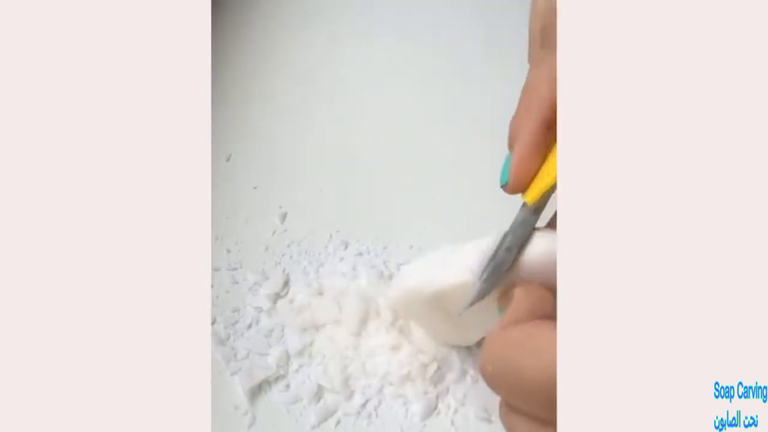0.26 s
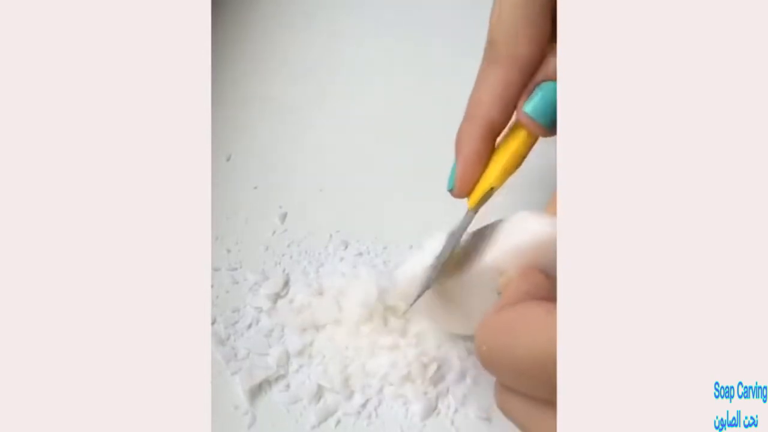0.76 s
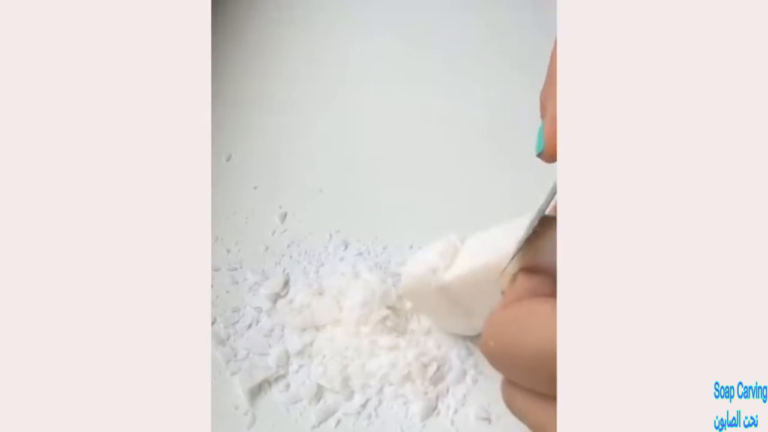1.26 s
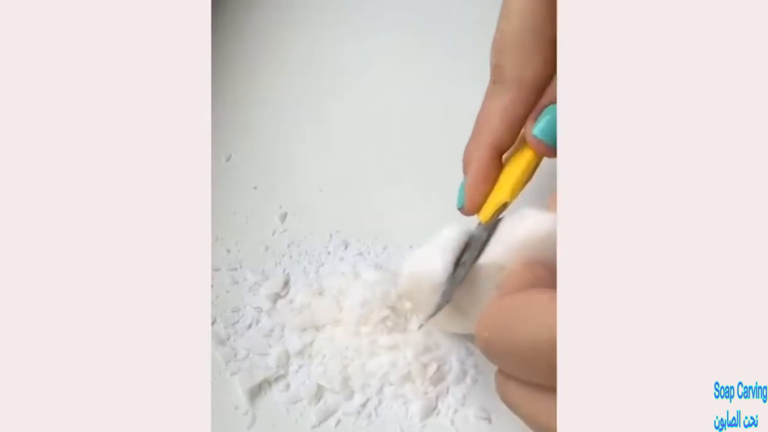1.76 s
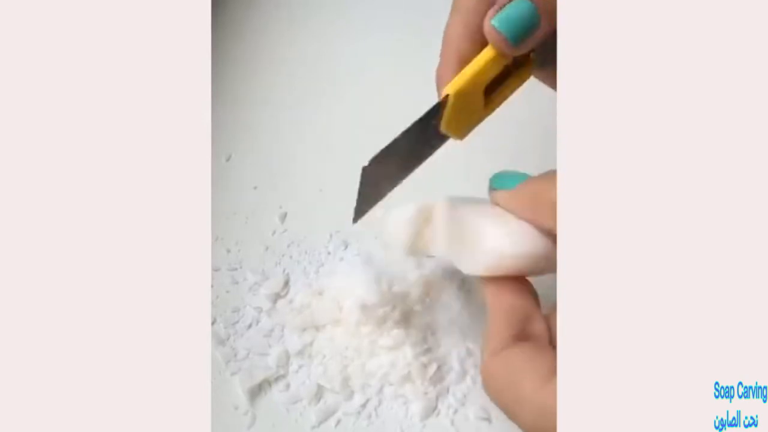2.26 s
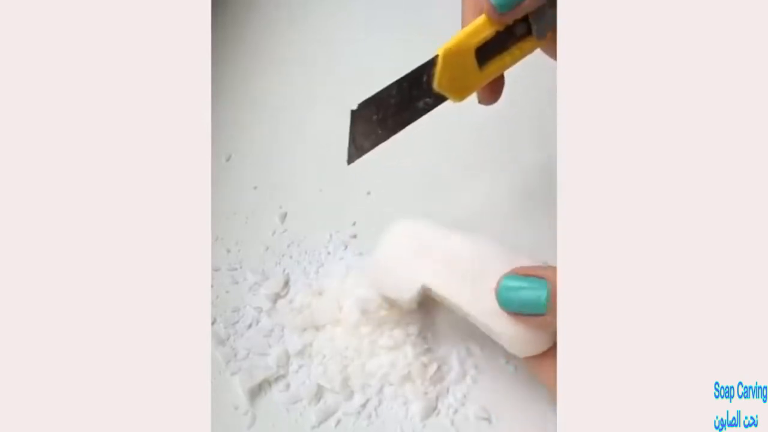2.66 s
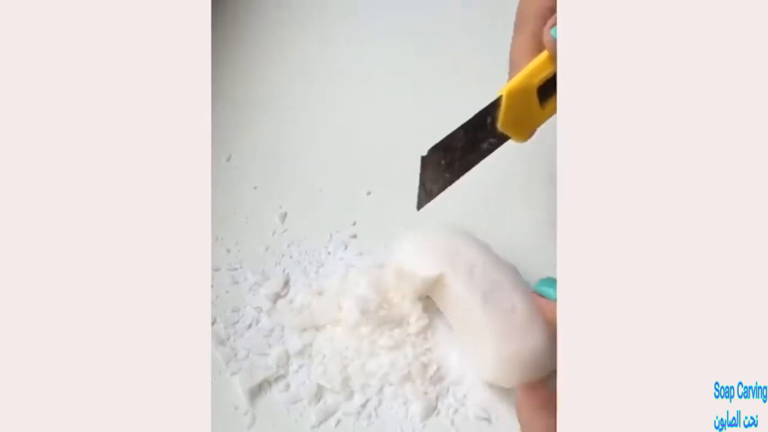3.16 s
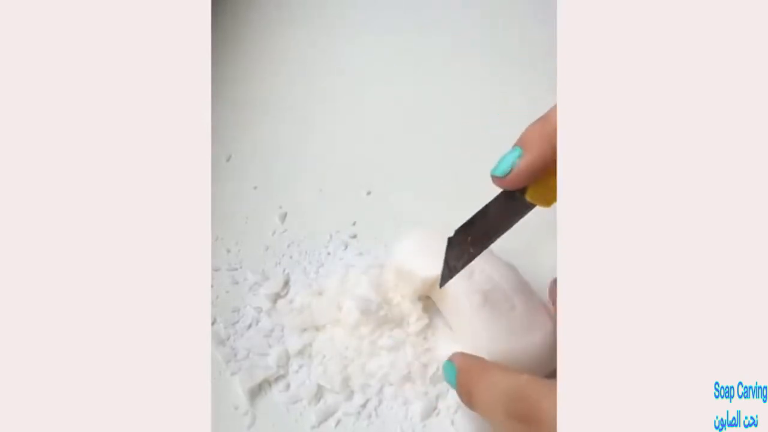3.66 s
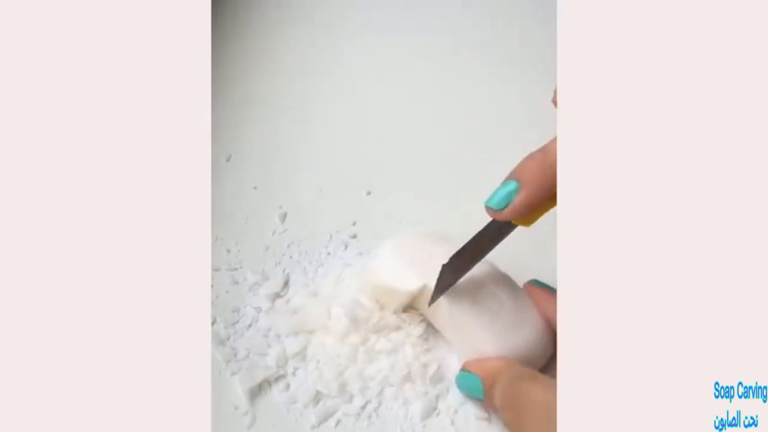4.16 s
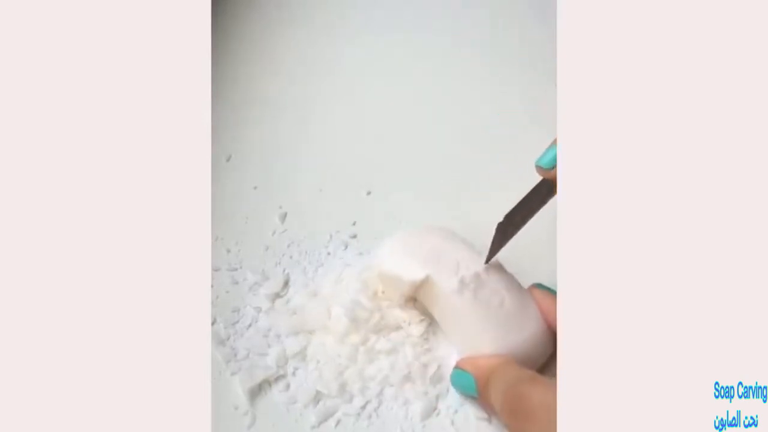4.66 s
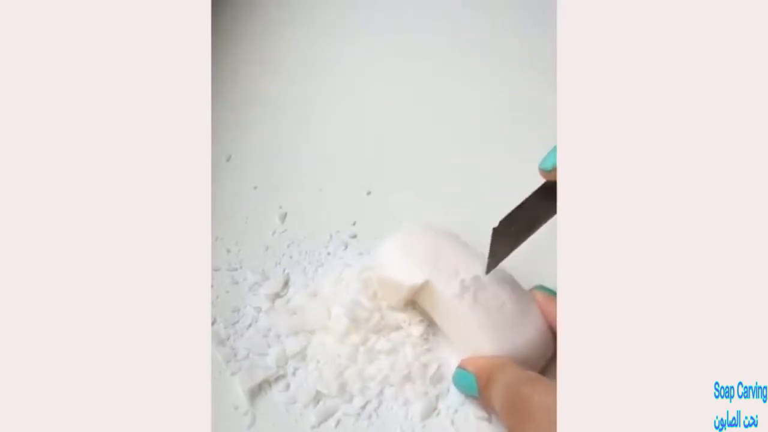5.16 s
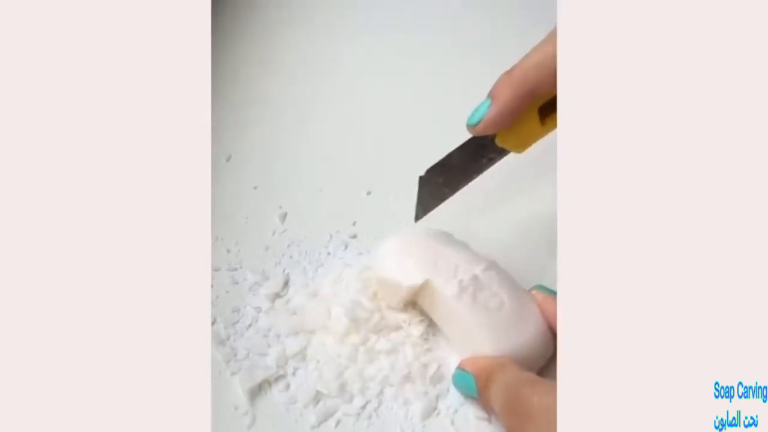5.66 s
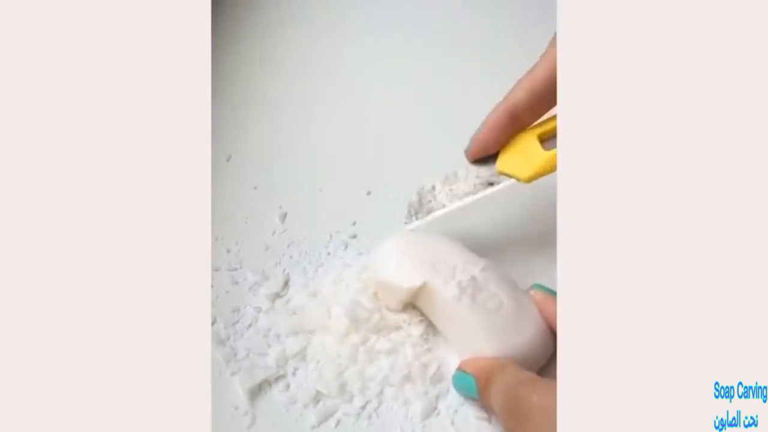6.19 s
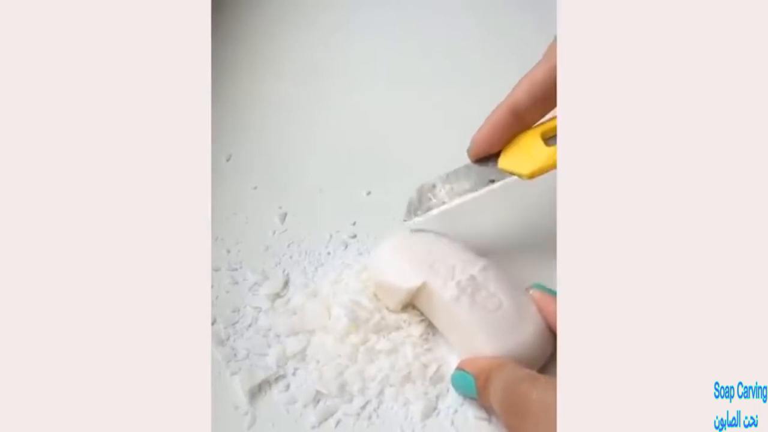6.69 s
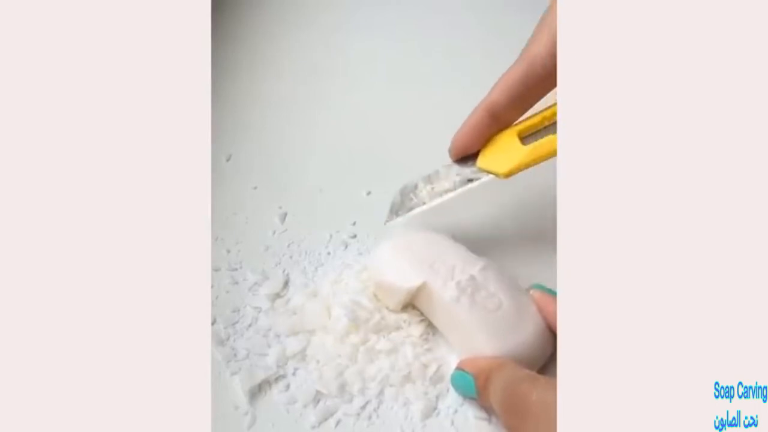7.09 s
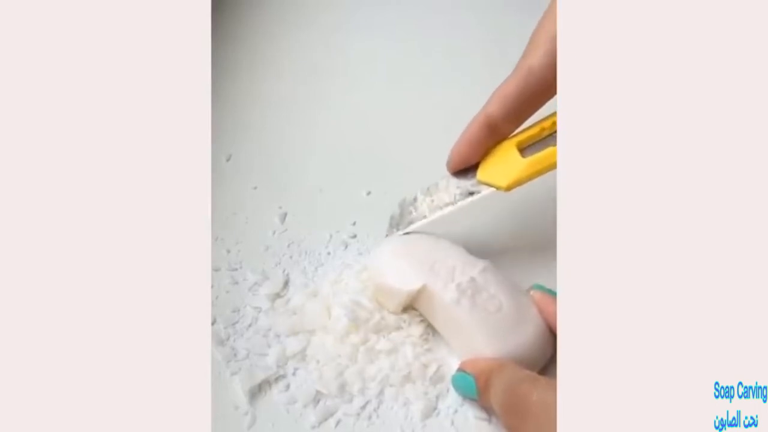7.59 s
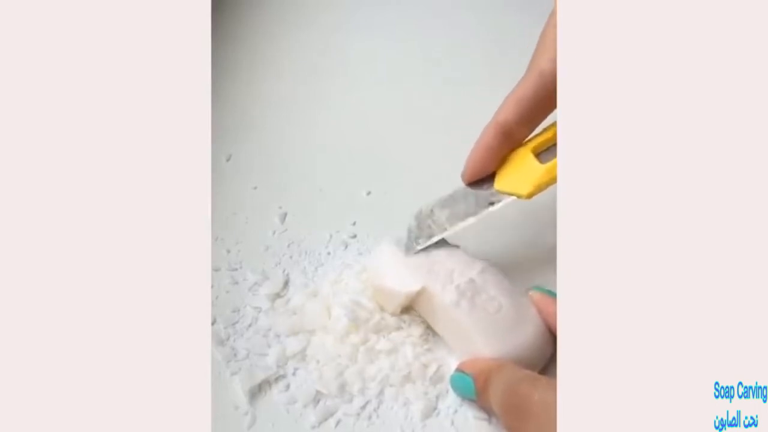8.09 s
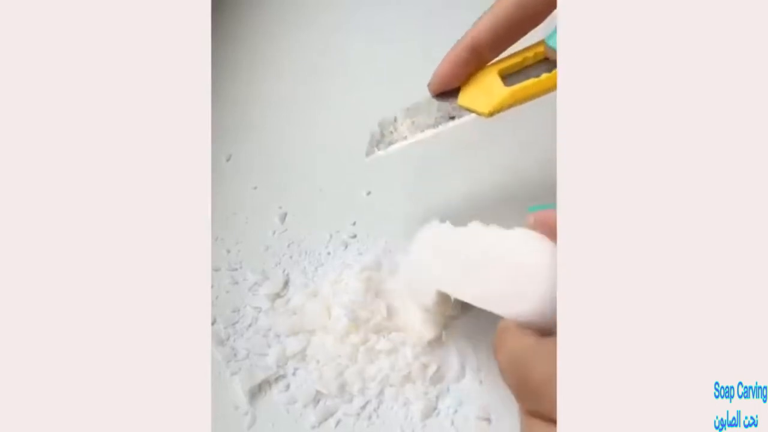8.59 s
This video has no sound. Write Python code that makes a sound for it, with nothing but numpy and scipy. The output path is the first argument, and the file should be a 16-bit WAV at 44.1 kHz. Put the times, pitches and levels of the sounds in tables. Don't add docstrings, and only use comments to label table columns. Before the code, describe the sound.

Close, dry rasping cuts into a crumbly soap bar, a hard knock on the table, sharp snapping chips, short flat scrapes, then soft fumbling.

```python
import sys
import numpy as np
from scipy import signal
from scipy.fft import rfft, irfft
from scipy.io import wavfile
from scipy.ndimage import uniform_filter1d, minimum_filter1d, map_coordinates

SR = 44100
rng = np.random.default_rng(int(sys.argv[2]) if len(sys.argv) > 2 else 0)


def master_out(mix):
    frames = np.transpose(np.atleast_2d(mix))
    ceiling = np.clip(frames, -1, 1)
    pcm = np.round(ceiling * 32767).astype(np.int16)
    wavfile.write(sys.argv[1], SR, pcm)


def volts_from_decibels(level):
    exponent = np.asarray(level, float) / 20
    return 10 ** exponent


N = 389844


def unit(x):
    return x / np.sqrt(np.mean(x ** 2) + 1e-20)


def along(points, hz):
    f, v = np.transpose(points)
    return np.interp(np.log(hz + 1), np.log(f + 1), v)


def curves(rows):
    s, *cols = np.transpose(rows)
    return [np.interp(np.arange(N) / SR, s, c) for c in cols]


def wobble(rate):
    knots = rng.standard_normal(int(N * rate / SR) + 4)
    return map_coordinates(knots, [np.arange(N) * rate / SR])


def response(spectrum, modes=(), size=8192):
    hz = np.fft.rfftfreq(size, 1 / SR)
    power = 1 + sum(volts_from_decibels(2 * db) / (1 + (2 * (hz - c) / w) ** 2) for c, w, db in modes)
    magnitude = np.maximum(volts_from_decibels(along(spectrum, hz)), 1e-6) * np.sqrt(power)
    cepstrum = irfft(np.log(magnitude))
    cepstrum[1:size // 2] *= 2
    cepstrum[size // 2 + 1:] = 0
    h = irfft(np.exp(rfft(cepstrum)))
    return h / np.linalg.norm(h)


def through(x, h):
    return signal.fftconvolve(x, h)[:len(x)]


def grains(per_s, spread_db):
    chance, sign, size = rng.random((3, N))
    happens = chance < per_s / SR
    return unit(happens * np.sign(sign - .5) * volts_from_decibels(-spread_db * np.log(size + 1e-4)))


def mode(hz, t60, t):
    return volts_from_decibels(-60 * t / t60) * np.sin(2 * np.pi * hz * t)


def halves(db, bright_db):
    low = volts_from_decibels(db) / np.sqrt(1 + volts_from_decibels(2 * bright_db))
    return np.array([low, low * volts_from_decibels(bright_db)])


# (frequency [Hz], density [dB per Hz])
AIR = [(12, -37), (20, -12), (76, -4), (115, -20), (169, -10.5), (256, -29.5), (470, -24), (1140, -34),
       (1830, -33.5), (13400, -36.5), (15000, -49.5)]


def still_air():
    hiss = unit(through(rng.standard_normal(N), response(AIR)))
    return volts_from_decibels(-66.5 + .5 * wobble(6)) * hiss


# (touch time [s], peak time [s], lift time [s], hiss level [dB], push on the table [dB])
DEEP_CUTS = [
    (-.4, 0.19, .33, -42.5, -29),
    (0.952, 1.315, 1.51, -42.5, -28),
    (1.531, 1.541, 1.555, -41.5, -35.5),
    (1.6, 1.608, 1.676, -51.5, -38.5),
]
FUMBLES = [(.48, 0.548, 0.6, -66.5, -56.5), (0.788, 0.815, 0.84, -66, -58.5),
           (1.7, 1.72, 1.81, -71.5, -53.5), (1.858, 1.891, 1.933, -55, -46.5),
           (1.92, 1.956, 2.034, -67, -69), (2.083, 2.093, 2.13, -61, -70.5),
           (2.34, 2.385, 2.37, -71.5, -65), (2.43, 2.459, 2.51, -70, -60), (2.6, 2.648, 2.685, -53, -51.5),
           (2.669, 2.72, 2.9, -68, -57), (2.862, 2.899, 2.98, -70, -69), (8.033, 8.041, 8.07, -70.5, -57),
           (8.079, 8.13, 8.27, -64, -57.5), (8.437, 8.455, 8.47, -62, -55.5), (8.48, 8.51, 8.535, -65, -56),
           (8.59, 8.645, 8.66, -65, -57), (8.685, 8.74, 8.765, -62, -46)]
DRAGS = [
    (3.568, 3.577, 3.72, -56.5, -55.5),
    (3.759, 3.796, 4.25, -60, -61.5),
    (3.87, 4.0, 4.08, -59.5, -63.5),
    (4.094, 4.14, 4.19, -53, -51.5),
    (4.371, 4.44, 4.55, -57.5, -59.5),
]
STABS = [(3.434, 3.445, 3.42, -59, -71), (3.462, 3.467, 3.53, -69.5, -55), (3.492, 3.523, 3.6, -67, -64),
         (3.54, 3.545, 3.5, -33.5, -59), (4.479, 4.49, 4.4, -55, -62), (4.75, 4.827, 4.99, -53, -55.5),
         (4.85, 4.863, 4.86, -38, -48), (4.883, 4.908, 4.9, -41.5, -51), (5.097, 5.116, 5.3, -71.5, -59.5),
         (5.135, 5.137, 5.178, -36, -46), (5.2, 5.222, 5.263, -27, -45), (5.581, 5.584, 5.62, -61, -61),
         (5.615, 5.661, 5.78, -57, -55.5), (5.681, 5.7, 5.696, -40, -60)]
SCRAPES = [(5.993, 6.098, 6.8, -75.5, -60.5), (6.099, 6.116, 6.128, -60, -61),
           (6.147, 6.157, 6.172, -52.5, -56), (6.192, 6.286, 6.31, -47, -46),
           (6.365, 6.378, 6.39, -53.5, -64.5), (6.591, 6.644, 6.74, -48, -50.5),
           (6.763, 6.773, 6.782, -48, -66.5), (6.922, 7.029, 7.075, -49.5, -51.5),
           (7.031, 7.052, 7.06, -69, -44), (7.281, 7.329, 7.372, -51.5, -56),
           (7.598, 7.64, 7.66, -67.5, -62), (7.675, 7.719, 7.92, -55, -51.5),
           (7.76, 7.8, 7.875, -47.5, -42.5), (7.938, 7.956, 7.968, -53, -67.5)]
# (swell before peak [dB], sag after peak [dB], push swing per hiss swing [ratio],
# brightness [dB], rubbing level [dB])
MANNER = [
    (23.3, 7, 1.05, 5.5, -10.5),
    (13, 7.5, 1.05, -2.5, -6.5),
    (5.94, 7.5, 1.2, 3.5, -8),
    (8.05, 9, 1, 3.5, -20.5),
    (8, 7, 1.6, 3, -12),
]
# (bite before touch [dB/s], hiss dying after lift [dB/s], trickling crumbs level [dB],
# brightness gained per swell [dB/dB])
EDGES = [
    (900, 550, -18, 0.34),
    (1202, 399.5, -18.5, 0.04),
    (396, 247.5, -13.5, 0.44),
    (2200, 620, -13.5, 0.26),
    (2532, 480, -22, -0.3),
]
# hiss level [dB], brightness [dB], push level [dB], rubbing level [dB]
REST_DB = (-84, 7, -82, -86.5)


def strokes():
    unload_db_per_s, crumbs_db_per_s = 280, 144
    rub_share = .6
    rest, rest_bright, rest_push, rest_rub = REST_DB
    levels = volts_from_decibels(2 * np.array([[rest], [rest], [rest_push], [rest_rub]]))
    power = np.ones((4, N)) * levels * [[1], [rest_bright], [1], [1]]
    kinds = zip((DEEP_CUTS, FUMBLES, DRAGS, STABS, SCRAPES), MANNER, EDGES)
    for rows, (swell, sag, swing, bright_db, rub_db), (bite, dying, crumbs_db, brightens) in kinds:
        for touch, peak, lift, hiss_db, push_db in rows:
            near = slice(max(round((touch - .1) * SR), 0), min(round((lift + .4) * SR), N))
            t = np.arange(near.start, near.stop) / SR
            arc_db = np.interp(t, np.maximum.accumulate([touch, peak, lift]), [-swell, 0, -sag])
            bite_db = bite * np.minimum(t - touch, 0)
            after = np.maximum(t - lift, 0)
            crumbs = volts_from_decibels(2 * (crumbs_db - crumbs_db_per_s * after))
            hiss = volts_from_decibels(2 * (hiss_db + arc_db + bite_db)) * (volts_from_decibels(-2 * dying * after) + crumbs)
            push = volts_from_decibels(2 * (push_db + swing * arc_db + bite_db))
            push = push * (volts_from_decibels(-2 * unload_db_per_s * after) + crumbs)
            rub = volts_from_decibels(2 * rub_db) * hiss ** rub_share * push ** (1 - rub_share)
            power[:, near] += [hiss, (bright_db + brightens * arc_db) * hiss, push, rub]
    hiss_db, push_db, rub_db = 10 * np.log10(power[[0, 2, 3]])
    return hiss_db, power[1] / power[0], push_db, rub_db


def stick_slip(jolt_db):
    coarse = np.clip((jolt_db + 70) / 35, .2, 1)
    relaxing = volts_from_decibels(-60 * np.arange(4000) / SR / .05)
    gives = 1 + through(abs(grains(110, spread_db=1.5)) / 22, relaxing)
    strength = (gives * volts_from_decibels(1.4 * wobble(200))) ** coarse
    return strength / np.sqrt(uniform_filter1d(strength ** 2, size=6000)), coarse


def patchy(x, depth_db):
    z = signal.stft(x, nperseg=512)[2]
    field = uniform_filter1d(rng.standard_normal(z.shape), size=3, axis=0)
    field = uniform_filter1d(field, size=16, axis=1)
    return signal.istft(z * volts_from_decibels(depth_db * unit(field)), nperseg=512)[1][:len(x)]


def shaving(hiss_db, bright_db, strength, coarse):
    grit = coarse * grains(3500, spread_db=3) + 1.2 * rng.standard_normal(N)
    grit /= np.sqrt(uniform_filter1d(grit ** 2, size=8000))
    return halves(hiss_db, bright_db) * unit(strength * patchy(grit, depth_db=3.5))


# (start time [s], way of holding [0 lifted, 1 deep cut, 2 tip drag, 3 chipping,
# 4 flat scrape, 5 entering, 6 crumbs alone])
GRIP = [(0, 1), (.9, 5), (1.2, 1), (1.425, 3), (1.8, 6), (2.28, 0), (3.2, 3), (3.74, 2), (4.46, 3),
        (5.9, 4), (7.93, 6), (8.01, 0)]


def held(way):
    start, ways = np.transpose(GRIP)
    return ways[np.searchsorted(start, np.arange(N) / SR, "right") - 1] == way


# (frequency [Hz], density [dB per Hz])
CRUMBLE = [(1200, -38.5), (2000, -13.5), (2700, -8.5), (7200, -12), (11600, -6.5), (13800, -7)]
# (frequency [Hz], width [Hz], level [dB])
DEEP_CUT = [(3990, 120, 8), (5780, 250, 6), (6430, 200, 4), (9300, 350, 5), (12200, 350, 4)]
ENTERING = [(3320, 300, 8), (4020, 100, 8)]
CHIPPING = [(2970, 490, 3.4), (4200, 400, 2.8), (12050, 600, 3.5)]
LIFTED = [(1650, 180, 9), (2150, 200, 9)]
TIP_DRAG = [(4150, 160, 5), (5700, 260, 10), (11800, 300, 3)]
FLAT_SCRAPE = [(3000, 200, 8), (3380, 110, 11), (4530, 110, 8), (8850, 150, 4), (10900, 700, 3)]


def blade(force):
    split_hz = 6500
    low_pass = signal.butter(4, split_hz, "low", fs=SR, output="sos")
    high_pass = signal.butter(4, split_hz, "high", fs=SR, output="sos")
    x = volts_from_decibels(5.5) * signal.sosfilt(low_pass, force[0]) + volts_from_decibels(3.0) * signal.sosfilt(high_pass, force[1])
    holds = (LIFTED, DEEP_CUT, TIP_DRAG, CHIPPING, FLAT_SCRAPE, ENTERING, ())
    return sum(through(held(way) * x, response(CRUMBLE, modes)) for way, modes in enumerate(holds))


# (frequency [Hz], density [dB per Hz])
TABLE = [(35, -33.5), (60, -8), (135, -6.5), (172, 3.5), (216, 0.5), (365, -2), (412, -9), (642, -6),
         (887, -24.5), (1500, -25), (1950, -54), (3300, -120)]
# frequency [Hz], t60 [s]
BOOM = (169, 0.2)
# frequency [Hz], t60 [s]
SWAY = (52, 0.078)
# (time [s], level [dB])
ROCK = [
    (0, -45),
    (.3, -37.5),
    (.42, -78),
    (.95, -71.5),
    (1.2, -49),
    (1.62, -39.5),
    (1.85, -81),
]
# (frequency [Hz], density [dB per Hz])
RUB = [(500, -20.5), (800, -1.5), (1250, -1.5), (2300, -9), (3500, -22), (6000, -59)]
# (frequency [Hz], width [Hz], level [dB])
BAR = [(1000, 70, 8), (1590, 150, 7), (2150, 160, 9)]


def jolts(hiss_db, jolt_db, rub_db, strength):
    t = np.arange(SR // 2) / SR
    catch_db = np.clip(hiss_db - uniform_filter1d(hiss_db, size=3000), -15, 8)
    slips = volts_from_decibels(jolt_db - 1.5 + 0.92 * catch_db) * unit(strength ** 0.55 * grains(800, spread_db=1.0))
    boom, sway = (h / np.linalg.norm(h) for h in (mode(*BOOM, t), mode(*SWAY, t)))
    lifted, flat = held(0), held(4)
    top = through((1 - 0.34 * lifted) * slips, response(TABLE))
    booming = through((0.18 + 0.5 * lifted + 0.28 * flat) * slips, boom)
    rocking = through(volts_from_decibels(curves(ROCK)[0]) * rng.standard_normal(N), sway)
    rocking = signal.sosfilt(signal.butter(2, 42, "high", fs=SR, output="sos"), rocking)
    scuffs = volts_from_decibels(rub_db - 2.0 + 0.26 * catch_db) * unit(strength * grains(1500, spread_db=2.5))
    return top + booming + rocking + through(scuffs, response(RUB, BAR))


# (frequency [Hz], level [dB], t60 [s])
TOP = [(345, -12, 0.03), (381, -20, 0.15), (460, -11.5, 0.03), (523, -4.5, 0.05), (656, -1, 0.039),
       (995, -7.5, 0.018)]


def ring(t):
    return sum(volts_from_decibels(db + rng.normal(0, 1.2)) * mode(hz, t60, t) for hz, db, t60 in TOP)


# frequency [Hz], t60 [s]
THUD = (310, 0.018)
# (time [s], peak level [dB], hardness [dB], boom level [dB])
KNOCKS = [(.101, -34, -22, -10), (0.2085, -27, -24.5, -10), (0.2366, -22.5, -34, -11.5),
          (0.2816, -23, -13, -5.5), (0.3218, -29.5, -18, -3.5), (0.951, -62, -16, -15), (1.0, -53, -14, -8),
          (1.019, -47, -11, -9), (1.071, -43.5, -14, -9), (1.149, -43, -15, -15), (1.216, -38, -16, -11),
          (1.172, -34, -22, -26), (1.2503, -28.5, -25, -29), (1.264, -29, -42, -22),
          (1.2757, -26.5, -31, -6), (1.3974, -26.5, -33, -28), (1.4613, -31, -23, -4),
          (1.4967, -28.5, -16, -14), (1.5399, -27, -20, -4.5), (1.6084, -34, -16, 2),
          (1.6185, -28.5, -21, -29), (1.6496, -49, -9, -6), (1.8894, -48, -29, -4.5), (2.454, -53, -5, -22),
          (2.851, -6, -20, -15), (3.4676, -48, -8.5, -21), (4.799, -52, -8, -4), (4.859, -44, -6, -6),
          (4.904, -48, -6, -4), (5.2012, -41, -1.5, -17), (5.723, -30, -8, 3), (6.192, -57, -14, -1),
          (6.254, -55.5, -18, 6), (6.589, -57, -14, -3), (6.922, -57, -14, -2), (7.032, -52.5, -24, 3),
          (7.283, -55.5, -16, 0), (7.732, -53.5, -8, 4), (7.775, -53, -20, -2), (6.775, -61.5, -25, 6),
          (7.8016, -46, -27, 8), (8.0375, -53, -21, 5), (8.09, -54, -1, -12), (8.194, -60, -4.5, -8),
          (8.443, -57, -4, -5), (8.507, -62.5, -2, 6.5), (8.648, -59.5, -7, 6.5), (8.69, -61, -5, 5),
          (8.729, -52, -4, 0), (8.799, -62, -1, -8), (8.755, -52, -25, 1)]


def knocks():
    out, t = np.zeros(N + SR), np.arange(SR // 2) / SR
    for s, db, hard_db, boom_db in KNOCKS:
        rattle = through(volts_from_decibels(-60 * t / 0.024) * rng.standard_normal(len(t)), response(RUB))
        low = mode(*BOOM, t) + 2.2 * mode(*THUD, t)
        blow = 0.84 * ring(t) + volts_from_decibels(boom_db + 1.0) * low + volts_from_decibels(hard_db) * rattle
        onset = 1 - np.exp(-t / 0.00029)
        out[round(s * SR):][:len(t)] += volts_from_decibels(db + 1.5) * onset * blow
    return signal.sosfilt(signal.butter(2, 130, "high", fs=SR, output="sos"), out[:N])


def splinter(size):
    depth_db, band_hz = 2.8, 800
    white, chance = rng.standard_normal((2, size))
    bins = band_hz * size // SR
    peaks = uniform_filter1d(uniform_filter1d(chance, size=bins), size=bins)
    colour = volts_from_decibels(depth_db * unit(peaks[:size // 2 + 1]))
    return unit(irfft(rfft(white) * colour, size))


# (peak time [s], peak level [dB], brightness [dB], width [s]) # chips breaking in the deep cuts,
# crumbs dropping, chips levered off by the tip, # the flat edge catching, and last the fingers fumbling
SNAPS = [(0.1082, -43.5, 3, 0.008), (0.256, -33.5, -6, 0.0041), (0.278, -36.5, 0, 0.008),
         (0.3232, -35, 3, 0.0052), (0.5093, -46.5, 19, 0.0014), (0.797, -56.5, -1, 0.0077),
         (0.8196, -53, -1, 0.0068), (1.1757, -46.5, -12, 0.0081), (1.28, -37, 17, 0.0077),
         (1.46, -34.5, 5, 0.0044), (1.4975, -36.5, 2, 0.003), (1.5417, -38, 0, 0.0035),
         (1.61, -43, 2, 0.0065), (1.621, -41, 5, 0.0058), (1.6477, -44, 1, 0.0034),
         (1.6705, -48, 2, 0.0084), (1.841, -57, 9, 0.0043), (1.876, -53, 3, .003), (1.882, -52, 11, .003),
         (1.8887, -45, 11, 0.006), (1.938, -59, 10, .004), (1.947, -56, 7, 0.004), (1.96, -53, 10, 0.0076),
         (2.0145, -61, 12, .003), (2.043, -57, 10, .002), (2.063, -61, 12, .002), (2.076, -55, 14, 0.0037),
         (2.086, -45, -6, 0.0016), (2.107, -53, 1, 0.0033), (2.182, -60, 10, 0.0022),
         (1.979, -54, 12, 0.0042), (2.0905, -39.5, 6, 0.0019), (2.0981, -43, -3, 0.0034),
         (2.1284, -49, 8, 0.0066), (2.1608, -48.5, 1, 0.0017), (2.194, -50, 1, 0.0057),
         (2.8529, -25.5, -1.5, 0.0094), (2.8598, -26, 7, 0.00088), (3.441, -41.5, -2, 0.0035),
         (3.55, -26.5, 6, 0.0058), (3.6172, -47, 8, 0.0055), (4.1952, -50.5, -14, 0.01),
         (4.4917, -36.5, 0.5, 0.0069), (4.753, -46, 8, 0.0047), (4.784, -52, 8, 0.0034),
         (4.7996, -31, 2.5, 0.0029), (4.838, -47, 0, .007), (4.859, -18.5, 9.5, 0.0055),
         (4.8932, -35, 5, 0.0031), (4.9055, -28, 3.5, 0.0087), (4.9162, -31.5, 11.5, 0.0059),
         (5.1006, -52, 2, 0.0045), (5.134, -36.5, 12, 0.0036), (5.1424, -16, 9, 0.0051),
         (5.2024, -12.5, 7, 0.007), (5.2088, -17, 6.5, 0.0075), (5.221, -18, 6, 0.0021),
         (5.236, -24.5, 10, .003), (5.246, -21.5, 16, 0.0045), (5.5827, -51, 19, 0.0035),
         (5.642, -48.5, 15, 0.0035), (5.6934, -28.5, 12.5, 0.0098), (5.724, -43.5, -4.5, 0.003),
         (5.941, -63, 4, 0.0045),
         (6.11, -52, 0, 0.0047), (6.151, -45, 7, 0.0091), (6.197, -51, 4, .004), (6.22, -52, 0, .003),
           (6.281, -36.5, -11, 0.0034), (6.3003, -32.5, -5.5, 0.0051), (6.373, -54, -4, 0.0052),
           (6.594, -43, 12, 0.0053), (6.625, -46, -4, .003), (6.688, -36, -6, 0.0044),
           (6.721, -46, 15, 0.0026), (6.768, -45.5, 4.5, 0.0044), (6.9258, -40.5, -3, 0.0066),
           (7.2848, -44.5, -7, 0.0048), (7.316, -53, -4, .003), (7.62, -65, 1.5, .004),
           (7.641, -60, 3, .003), (7.68, -45.5, -5, 0.0092), (7.712, -42.5, -3, 0.0053),
           (7.732, -42.5, 0, 0.0064), (7.779, -40, -16, 0.0032), (7.797, -40.5, 13, 0.0058),
           (7.8239, -34, 1, 0.0029), (7.953, -50.5, 4, .004), (8.091, -62, -12, .005),
           (8.194, -64, -9.5, .005), (8.444, -59, -10, .005), (8.507, -58, -16.5, 0.0058),
           (8.65, -67, -14, .004), (8.691, -61, -14, 0.0055), (8.7152, -50, -11, 0.0045),
           (8.7314, -55.5, -18, 0.0042), (8.742, -55, -16, 0.0034), (8.802, -57, -14, 0.0042)]


def snaps():
    lead = SR // 50
    force, t = np.zeros((2, N + SR)), np.arange(-lead, SR // 10) / SR
    for s, db, bright_db, width in SNAPS:
        width = max(width, .001)
        tear = np.exp(-np.where(t < 0, (t / (0.25 * width)) ** 2, t / (.6 * width)))
        at = max(round(s * SR) - lead, 0)
        force[:, at:at + len(t)] += halves(db + .5, bright_db)[:, None] * tear * splinter(len(t))
    return force[:, :N]


# (frequency [Hz], t60 [s])
ROOM = [(100, 0.7), (500, 0.4), (1300, 0.36), (3000, 0.3), (12000, 0.069)]


def room(x):
    hz, t, z = signal.stft(rng.standard_normal(SR // 2), SR, nperseg=256)
    fall_db = -60 * t / along(ROOM, hz)[:, None]
    near, far = volts_from_decibels(2.7 * fall_db), volts_from_decibels(fall_db - 9.5)
    tail = signal.istft(z * (near + far), SR, nperseg=256)[1]
    return through(x, np.pad(tail / np.linalg.norm(tail), (200, 0)))


def scene():
    air = still_air()
    hiss_db, bright_db, jolt_db, rub_db = strokes()
    strength, coarse = stick_slip(jolt_db)
    cutting = blade(shaving(hiss_db, bright_db, strength, coarse))
    pushing = jolts(hiss_db, jolt_db, rub_db, strength)
    blows, tears = knocks(), snaps()
    body = volts_from_decibels(-18.5) * response(RUB) + volts_from_decibels(-13) * response(TABLE)
    chips = blade(tears) + through(tears[0], body)
    answer = room(volts_from_decibels(-16) * chips + volts_from_decibels(-17) * blows)
    return (cutting + pushing + chips + blows + answer + air)[None]


def top_cut(x):
    return signal.sosfilt(signal.butter(12, 15200, fs=SR, output="sos"), x)


def record(dry):
    top_hz, treble_hz = 14000, 1500
    hz = np.fft.rfftfreq(N, 1 / SR)
    x = irfft(rfft(dry) / (1 + (hz / top_hz) ** 300), N)
    treble = irfft(rfft(x) * (1 - 1 / (1 + (hz / treble_hz) ** 4)), N)
    level = np.sqrt(abs(uniform_filter1d(treble ** 2, size=90)))
    coming = -minimum_filter1d(-level, size=481, origin=-240)
    rise = coming / (level + 1e-9)
    keep = uniform_filter1d(1 / (1 + (rise / volts_from_decibels(23.5)) ** 6), size=40)
    return top_cut(x - (1 - keep) * treble)


dry = scene()
out = record(dry)
master_out(out)
```